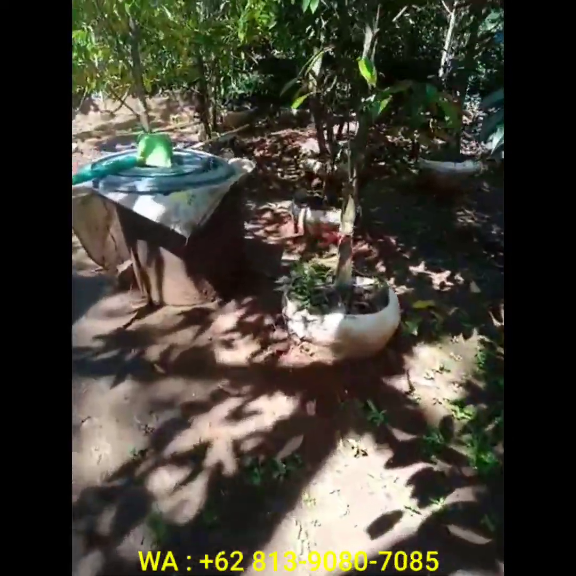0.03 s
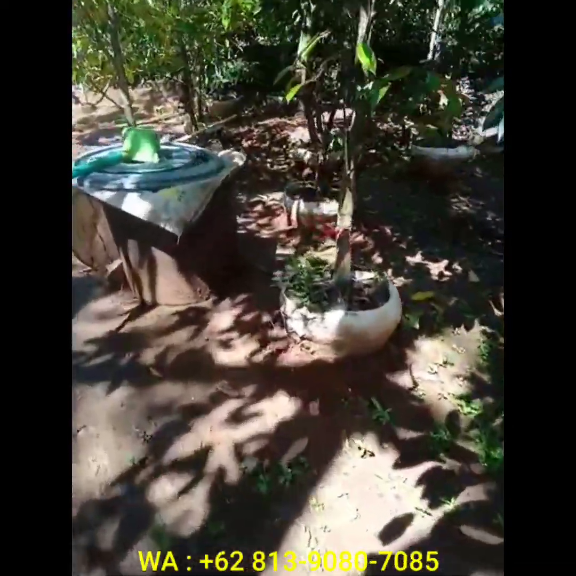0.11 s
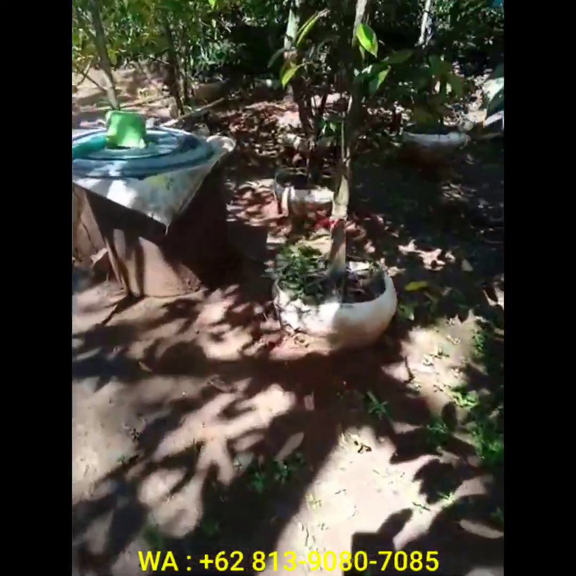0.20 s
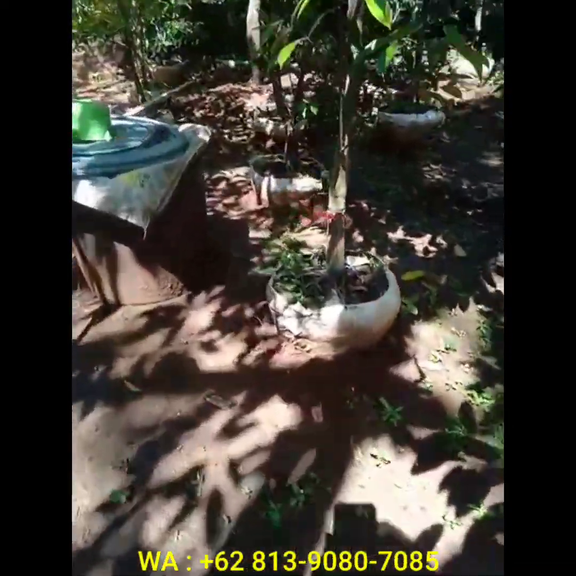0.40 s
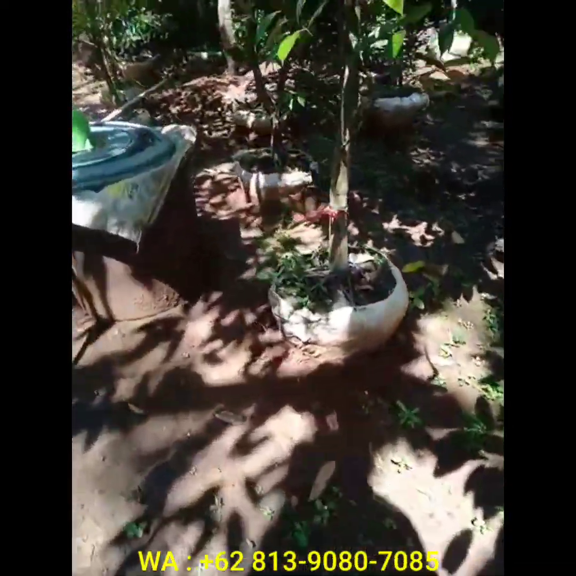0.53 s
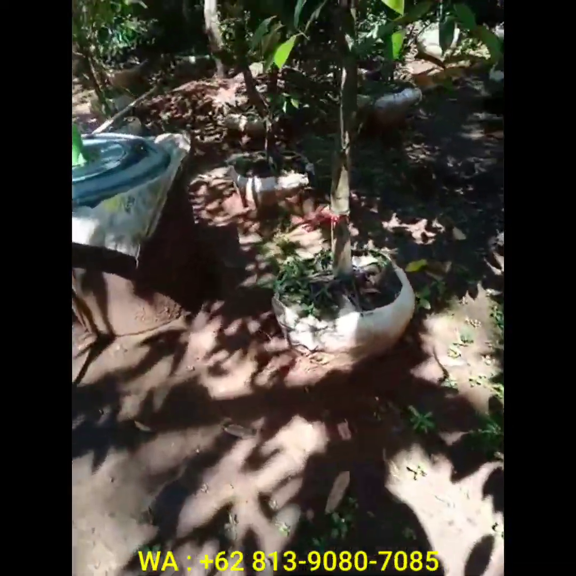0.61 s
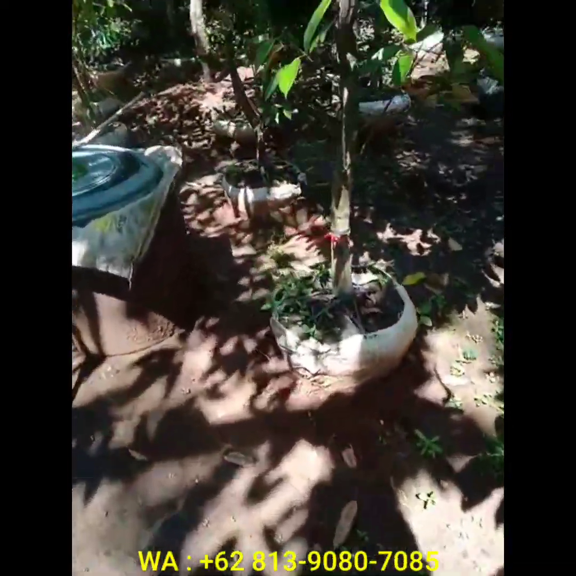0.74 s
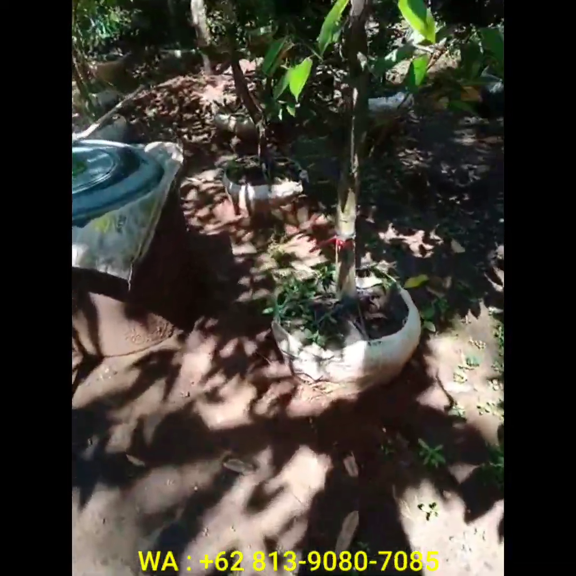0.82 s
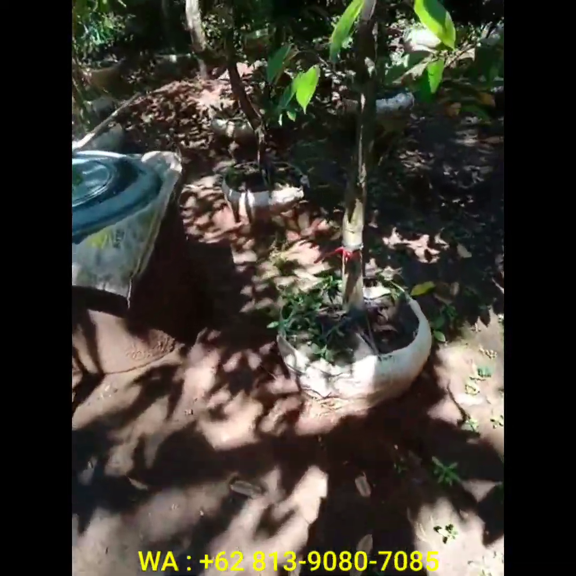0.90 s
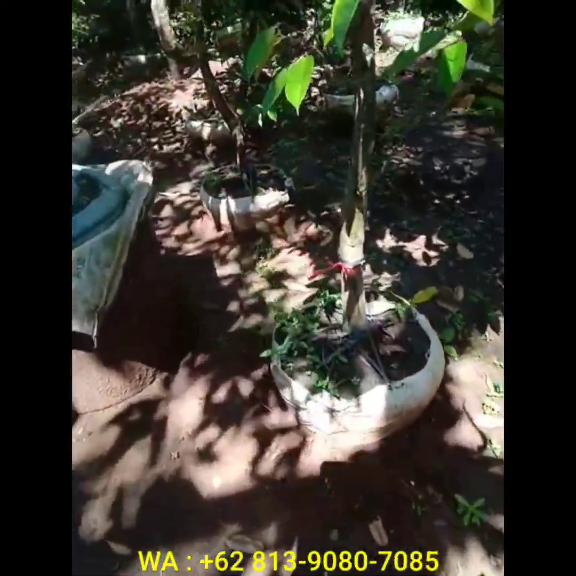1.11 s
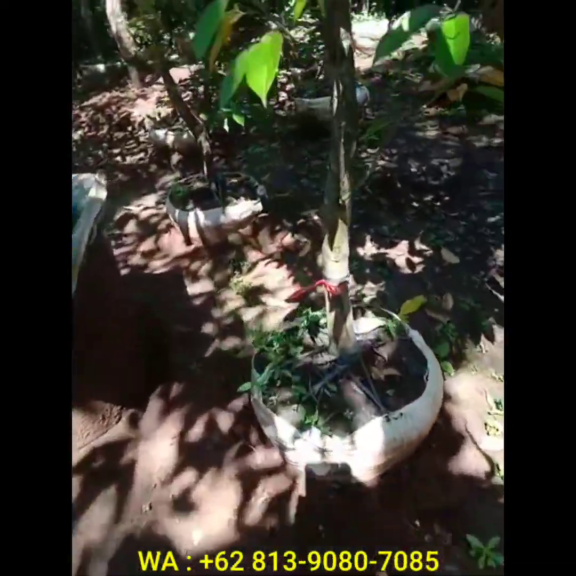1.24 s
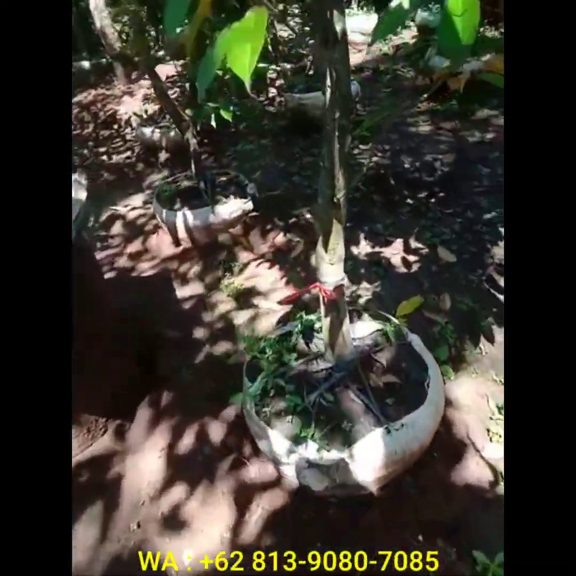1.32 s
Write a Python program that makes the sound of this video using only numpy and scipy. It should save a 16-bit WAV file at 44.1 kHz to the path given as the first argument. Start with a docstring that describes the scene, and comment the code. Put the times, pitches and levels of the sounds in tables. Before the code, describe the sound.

Slow footsteps on dry leaves and earth: a loud scuff rolls into crackling, something swishes past, then softer steps snap more leaves. A hand-held microphone outdoors picks up low rumble, faint foliage hiss and distant chirps.

```python
"""Slow steps on garden leaves

A sole scuffs loudly through dry earth and fallen leaves, then rolls on with a crunch of tiny fractures.
Something brushes past with a swish of friction; softer footfalls knock on the ground and snap dry leaves.
Air and handling rumble on a hand-held microphone, under a faint leafy hiss and a few far chirps."""
import sys
import numpy as np
from scipy import signal
from scipy.fft import rfft, irfft, next_fast_len
from scipy.io import wavfile
from scipy.ndimage import uniform_filter1d

SR = 44100
rng = np.random.default_rng(int(sys.argv[2]) if len(sys.argv) > 2 else 0)


def inscribe(sig):
    """Save sig as 16-bit PCM at rate SR to the path in sys.argv[1].

    A 1-D sig is mono; a 2-D sig holds one channel per row.
    Samples are clipped to [-1, 1] before scaling.
    """
    pcm = np.round(np.clip(np.atleast_2d(sig).T, -1, 1) * 32767)
    wavfile.write(sys.argv[1], SR, pcm.astype(np.int16))


N = 61740
T = np.arange(N) / SR

# Tone of the scuff, the crunch and the swish. Each row: frequency in Hz, relative level in dB.
SCUFF_EQ = [(100, -26), (200, -25.5), (290, -9.5), (420, -19.5), (620, -5.5), (820, -11), (980, -15.5),
            (1200, -4), (1550, -13), (2400, -8.5), (3050, -8.5), (3400, -14.5), (3750, -8), (5400, -8),
            (7400, -9), (8600, -21), (13800, -26), (14900, -11)]
CRUNCH_EQ = [(120, -41), (200, -27), (330, -9.5), (480, -8.5), (700, -11), (920, -16), (1220, -4),
             (1700, -4), (2500, -1.5), (3200, -5), (4500, -7), (5800, -1.5), (7400, -5.5), (8350, -22),
             (13800, -27.5), (15100, -10.5)]
SWISH_EQ = [(290, -26), (800, -28), (1240, -10), (1750, -11), (2200, -2.5), (3150, -3.5), (4700, -3),
            (6000, 1.5), (7200, -1.5), (8600, -18.5), (13800, -28.5), (15100, -8)]
# The crunch follows the weight of each step on the litter. Each row: time in seconds, level in dB.
FIRST_TREAD = [(0, -53.5), (.038, -52), (.1, -57), (.15, -50), (.188, -48.5), (.215, -41), (.29, -40.5),
               (.314, -41.5), (.34, -41), (.372, -38.5), (.395, -40), (.44, -44.5), (.46, -38.5),
               (.486, -43), (.55, -37.5), (.585, -49.5), (.63, -53), (.72, -55)]
SECOND_TREAD = [(1.03, -70), (1.046, -46), (1.075, -46.5), (1.1, -42), (1.16, -66), (1.22, -49.5),
                (1.29, -64), (1.36, -57), (1.378, -45), (1.4, -50)]
# Envelope of the brushing swish. Each row: time in seconds, level in dB.
SWISH_ENVELOPE = [(.72, -57.5), (.775, -45.5), (.83, -48.5), (.88, -44.5), (.92, -43.5), (.96, -50),
                  (1.03, -56), (1.08, -63), (1.115, -42.5), (1.17, -44.5), (1.21, -48.5), (1.28, -68)]
# The rub rises with the speed of the stroke. Each row: time in seconds, pitch in Hz, level in dB.
RUB_SWEEP = [(0.752, 2306, -59), (.785, 2496, -49.5), (.84, 2890, -54), (.885, 4150, -48),
             (.915, 4737, -42.5), (0.936, 4860, -42.5), (0.954, 5200, -55)]
# The sole knocks on the ground. Each row: start in seconds, level in dB, pitch in Hz.
KNOCKS = [(0.3222, -26, 1050), (0.451, -37, 1370), (0.456, -27, 1480), (0.554, -25, 1510),
          (0.5582, -21, 1353), (0.5626, -23.5, 987), (1.044, -33.5, 1350), (1.057, -32, 1410),
          (1.089, -24.5, 1167), (1.3737, -35, 2173), (1.3764, -25.5, 1854), (1.3849, -20, 1600),
          (1.39, -33, 1110)]
# The ring of a knock. Each row: multiple of the pitch, relative level in dB, seconds to fall 60 dB.
KNOCK_MODES = [(.55, -17, 0.0064), (.75, -12.5, 0.0037), (1, -5, 0.016), (1.3, -7.5, 0.013),
               (2.3, -37, 0.0088)]
# Dry leaves snap. Each row: start in seconds, level in dB, pitch in Hz.
LEAF_SNAPS = [(.184, -30, 4500), (.2852, -24, 8500), (.323, -17.5, 4300), (.5025, -33, 7000),
              (.5248, -28, 5600), (.5268, -29, 6000), (.544, -31, 6500), (.5555, -28, 5500),
              (.5632, -24, 5500), (.867, -30, 5200), (.9098, -26, 5000), (1.0895, -30, 4500),
              (1.0975, -26, 6000), (1.1143, -25, 5600), (1.3728, -31, 5500), (1.3762, -29, 5600)]
# Soft bumps on the microphone. Each row: centre in seconds, level in dB, pitch in Hz.
HANDLING_BUMPS = [(0.277, -40, 143), (0.356, -43, 93), (0.618, -45.5, 110), (0.684, -44, 135),
                  (0.816, -46, 96), (0.916, -40.5, 131), (1.168, -38, 131), (1.316, -44.5, 107)]
# Faint raspy chirps, perhaps far birds. Each row: centre and half length in seconds, level in dB,
# pitch in Hz, glide in Hz per second, width in Hz.
CHIRPS = [(.038, 0.0078, -48, 2525, -3, 258), (0.098, 0.02, -52.5, 610, -500, 31),
          (0.146, 0.0066, -47, 2716, -3000, 220), (.175, 0.027, -47.5, 2420, -3000, 159),
          (0.603, 0.036, -50.5, 2430, -5000, 198), (0.658, .015, -51.5, 2296, 0, 260),
          (0.96, 0.025, -47.5, 4313, -2000, 90), (0.983, .025, -48, 4890, -1000, 90),
          (1.001, 0.037, -50, 4060, -7000, 170)]
# Tone of the air rumble and the foliage hiss. Each row: frequency in Hz, relative level in dB.
RUMBLE_EQ = [(15, -52), (25, -18), (43, -24.5), (86, -1.5), (129, -1), (231, -10.5), (291, -10), (325, -10),
             (394, -32), (450, -17.5), (580, -59), (990, -120)]
FOLIAGE_EQ = [(150, -16.5), (250, -13), (450, -6), (603, -6.5), (781, -8.5), (1330, -10.5), (1530, -11.5),
              (2800, -14), (3060, -13.5), (5410, -10.5), (5890, -22), (8040, -32), (15500, -22)]
# Bounces off the ground, pots and the walker's body. Each row: delay in seconds, level in dB.
ECHOES = [(.0034, -11.5), (.0083, -14), (.0127, -19.5), (0.019, -31)]
# Resonances and notches of the microphone port. Each row: centre in Hz, width in Hz, gain in dB.
MICROPHONE_EQ = [(815, 19, 4), (1193, 44, 7.5), (1275, 60, 8.5), (2170, 62, 1), (2630, 140, 1),
                 (3580, 110, 2), (4850, 59, -4), (5630, 180, 2.5), (6155, 154, 5.5), (6496, 213, -11)]


def scuff(peak_db=-20.5, peak_s=.2135, hold_s=.039, rise_db_per_s=1016, fall_db_per_s=665):
    """The sliding sole grinds grit and leaves: fast attack, short hold, quick release."""
    attack_db = rise_db_per_s * np.maximum(0, peak_s - T)
    release_db = fall_db_per_s * np.maximum(0, T - peak_s - hold_s)
    envelope = from_db(np.maximum(peak_db - attack_db - release_db, -200))
    return colour(grains(per_s=26000, spread_db=.5, clump_db=2.1) * envelope, SCUFF_EQ)


def crunch():
    """The litter crackles as the weight rolls over it."""
    weight = level(FIRST_TREAD) + level(SECOND_TREAD)
    return colour(grains(per_s=15000, spread_db=3.5, clump_db=2.47) * weight, CRUNCH_EQ)


def knocks(detune=.073, grit_db=-3.5, grit_t60_s=.027, low_cut_hz=130):
    """Each contact of the sole rings a few heavily damped modes and crushes a little grit."""
    out = np.zeros(N)
    for start, db, hz in KNOCKS:
        age = np.maximum(T - start, 0)
        for multiple, mode_db, t60 in KNOCK_MODES:
            mode_hz = hz * multiple * (1 + detune * rng.standard_normal())
            ring = np.sin(2 * np.pi * mode_hz * age) * rng.choice([-1, 1])
            out += from_db(db + mode_db) * decay(age, t60) * ring
        grit = rng.standard_normal(N) * (age > 0) * from_db(db + grit_db) * decay(age, grit_t60_s)
        grit_hz, width_hz = 1.37 * hz, 1.6 * hz
        out += resonance(resonance(grit, grit_hz, width_hz), grit_hz, width_hz)
    return signal.sosfilt(signal.butter(2, low_cut_hz, "high", fs=SR, output="sos"), out)


def leaf_snaps(splinter_db=-16, t60_s=.02, relative_width=.45, high_cut_hz=8800):
    """A sharp crack and a short spray of splinters sound through the leaf's broad resonance."""
    out = np.zeros(N)
    for start, db, hz in LEAF_SNAPS:
        age = T - start
        burst = rng.standard_normal(N) * (age > 0) * from_db(splinter_db) * decay(age, t60_s)
        burst[int(start * SR)] += 2  # the crack itself
        width_hz = relative_width * hz
        snap = resonance(resonance(burst, hz, width_hz), hz, 2 * width_hz)
        out += from_db(db) * snap / np.abs(snap).max()
    return signal.sosfilt(signal.butter(2, high_cut_hz, fs=SR, output="sos"), out)


def swish():
    """Something brushes past: fine friction grains and a broad rub that sweeps upward."""
    friction = grains(per_s=20000, spread_db=2, clump_db=1.75) * level(SWISH_ENVELOPE)
    times, hz, db = np.transpose(RUB_SWEEP)
    rub = narrow_noise(np.interp(T, times, hz), width_hz=650) * level(np.c_[times, db])
    return colour(friction, SWISH_EQ) + rub


def handling_bumps(width_s=.0089):
    """A few low cycles swell and fade as the walker's hand jolts."""
    out = np.zeros(N)
    for centre, db, hz in HANDLING_BUMPS:
        swell = np.exp(-np.minimum(((T - centre) / width_s) ** 2 / 2, 20))
        out += from_db(db) * swell * np.sin(2 * np.pi * (hz * (T - centre) + rng.random()))
    return out


def chirps():
    """Short raspy notes swell and fade, most sagging a little in pitch."""
    out = np.zeros(N)
    for centre, half_length, db, hz, glide, width_hz in CHIRPS:
        swell = np.exp(-np.minimum(((T - centre) / half_length) ** 2, 20))
        out += from_db(db) * swell * narrow_noise(hz + glide * (T - centre), width_hz)
    return out


def air_and_foliage(rumble_db=-55.5, hiss_db=-58, rumble_side_db=-21.5, hiss_side_db=-9):
    """A stereo bed: moving air rumbles near the centre, far foliage hisses a little wider."""
    rumble = from_db(rumble_db) * colour(rng.standard_normal((2, N)), RUMBLE_EQ)
    hiss = from_db(hiss_db) * colour(rng.standard_normal((2, N)), FOLIAGE_EQ)
    mid = rumble[0] + hiss[0]
    side = from_db(rumble_side_db) * rumble[1] + from_db(hiss_side_db) * hiss[1]
    return np.array([mid + side, mid - side])


def with_echoes(x):
    """A few early reflections; outdoors there is no tail."""
    return x + sum(from_db(db) * np.r_[np.zeros(int(delay * SR)), x][:N] for delay, db in ECHOES)


def grains(per_s, spread_db, clump_db, bands=7):
    """Tiny fractures of uneven size come in clumps, each sounding in one band; rms 1."""
    edges_hz = np.geomspace(400, 17000, bands + 1)
    edges_hz[0] = 40  # the lowest band reaches into the bass
    clumps = from_db(clump_db * drift(83))
    out = np.zeros(N)
    for k in range(bands):
        clicks = (rng.random(N) < per_s / bands / SR) * rng.choice([-1, 1], N)
        sizes = from_db(spread_db * np.minimum(rng.exponential(1, N), 3.5))
        band = signal.butter(2, edges_hz[k:k + 2], "band", fs=SR, output="sos")
        out += signal.sosfilt(band, rms_one(clicks * sizes) + 1e-18)
    return rms_one(out * clumps)


def narrow_noise(hz, width_hz):
    """A band of noise around a moving pitch."""
    phase = 2 * np.pi * np.cumsum(hz) / SR
    return drift(width_hz) * np.cos(phase) + drift(width_hz) * np.sin(phase)


def drift(rate_hz):
    """Smooth random wander; rms 1."""
    pole = np.exp(-2 * np.pi * rate_hz / SR)
    return rms_one(signal.lfilter([1], [1, -2 * pole, pole * pole], rng.standard_normal(2 * N))[N:])


def colour(x, curve):
    """A unit-power EQ along a curve of (Hz, dB) points."""
    size = next_fast_len(2 * N)
    size += size % 2
    hz, db = np.transpose(curve)
    log_bins = np.log(np.fft.rfftfreq(size, 1 / SR) + 1)
    gain = rms_one(from_db(np.interp(log_bins, np.log(hz), db)))
    # Minimum phase: nothing rings ahead of a transient.
    cepstrum = irfft(np.log(gain))
    cepstrum[1:size // 2] *= 2
    cepstrum[size // 2 + 1:] = 0
    return irfft(rfft(x, size) * np.exp(rfft(cepstrum)))[..., :N]


def resonance(x, hz, width_hz):
    """A two-pole band-pass with unity gain at its peak."""
    radius = np.exp(-np.pi * width_hz / SR)
    feedback = [1, -2 * radius * np.cos(2 * np.pi * hz / SR), radius ** 2]
    return signal.lfilter(np.array([1, 0, -1]) * (1 - radius ** 2) / 2, feedback, x + 1e-18)


def level(curve):
    """A gain envelope through (seconds, dB) points, fading fast beyond its ends."""
    times, db = np.transpose(curve)
    outside_s = np.maximum(0, np.maximum(times[0] - T, T - times[-1]))
    return from_db(np.interp(T, times, db) - 400 * outside_s)


def decay(age, t60):
    """A tail that falls 60 dB every t60 seconds."""
    return from_db(-60 * np.clip(age / t60, 0, 4))


def from_db(db):
    """Decibels to gain."""
    return 10 ** (np.asarray(db) / 20)


def rms_one(x):
    """Scale to unit power."""
    return x / np.sqrt(np.mean(x ** 2) + 1e-20)


def limiter(x, ceiling_db=-18.5, window_s=.0065):
    """A soft knee holds the short-term rms level under the ceiling."""
    power = uniform_filter1d(np.mean(x ** 2, axis=0), int(window_s * SR))
    drive = np.maximum(power, 0) / from_db(ceiling_db) ** 2
    return x / (1 + drive ** 3) ** (1 / 6)


def scene():
    """Steps, swish, chirps and bumps sit dead centre over the garden bed."""
    centre = scuff() + with_echoes(crunch() + swish()) + chirps()
    centre += knocks() + leaf_snaps() + handling_bumps()
    return centre + air_and_foliage()


def record(dry):
    """The microphone port colours the mix, a limiter flattens the scuff, and the top is cut."""
    for hz, width_hz, db in MICROPHONE_EQ:
        gain, width = from_db(db / 2), np.tan(np.pi * width_hz / SR)
        tuning = -2 * np.cos(2 * np.pi * hz / SR)
        feedforward = [1 + width * gain, tuning, 1 - width * gain]
        feedback = [1 + width / gain, tuning, 1 - width / gain]
        dry = signal.lfilter(feedforward, feedback, dry)
    high_cut = signal.ellip(12, .2, 80, 15500, fs=SR, output="sos")
    return signal.sosfilt(high_cut, limiter(dry))


dry = scene()
out = record(dry)
inscribe(out)
```